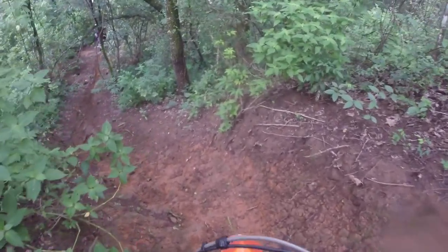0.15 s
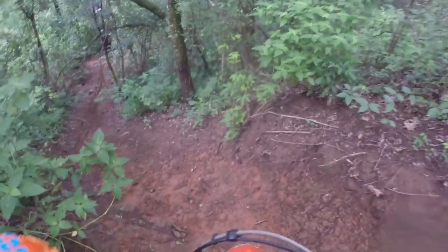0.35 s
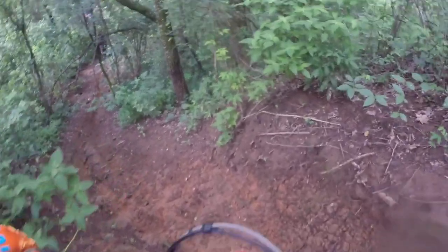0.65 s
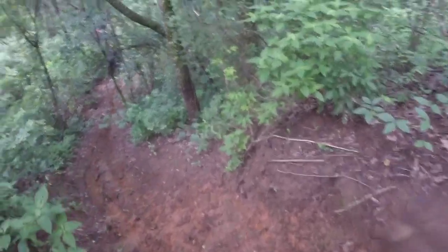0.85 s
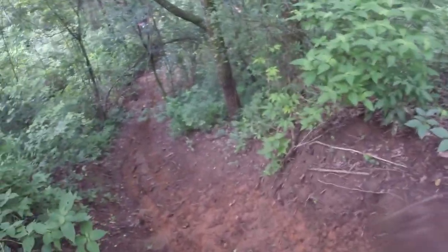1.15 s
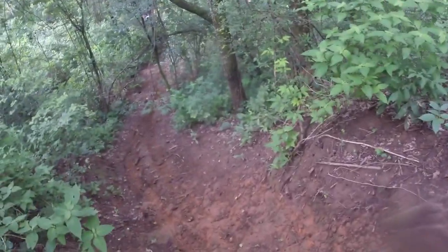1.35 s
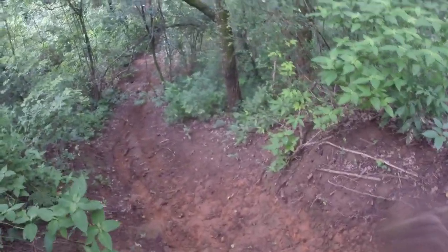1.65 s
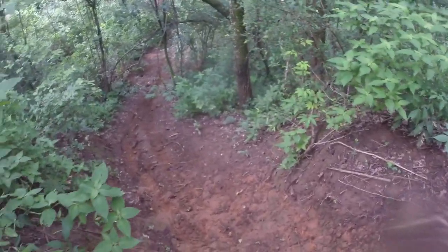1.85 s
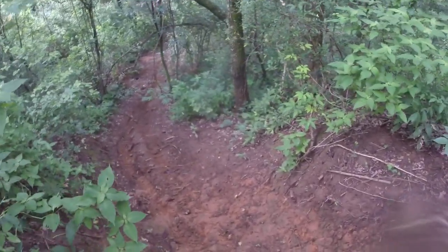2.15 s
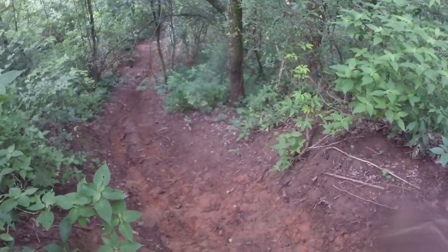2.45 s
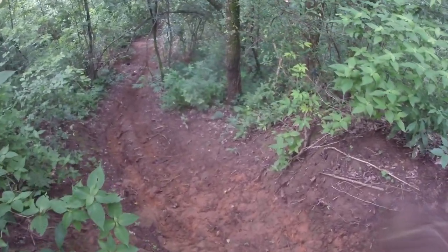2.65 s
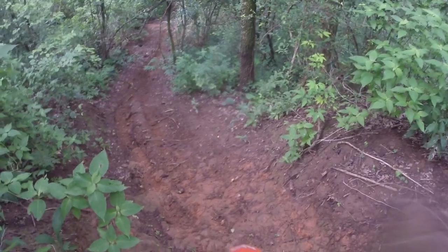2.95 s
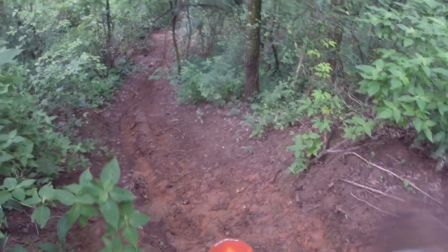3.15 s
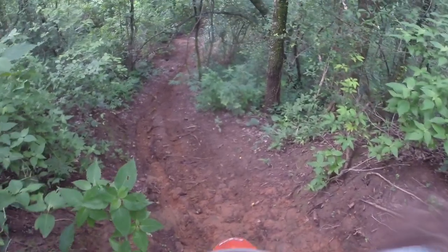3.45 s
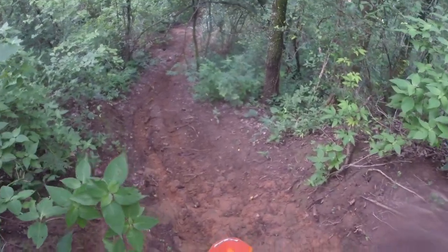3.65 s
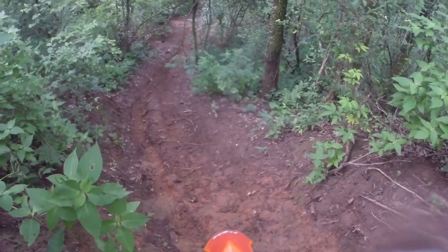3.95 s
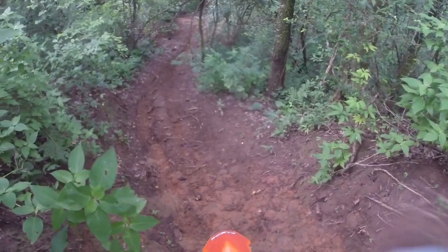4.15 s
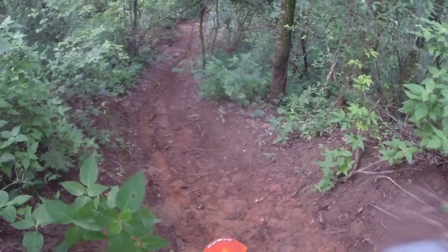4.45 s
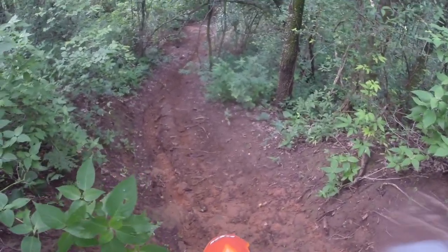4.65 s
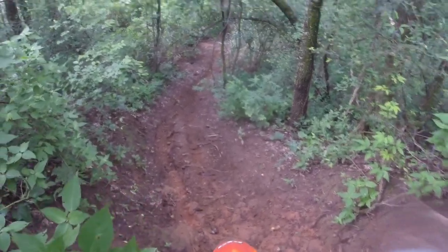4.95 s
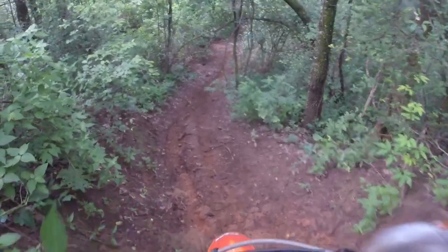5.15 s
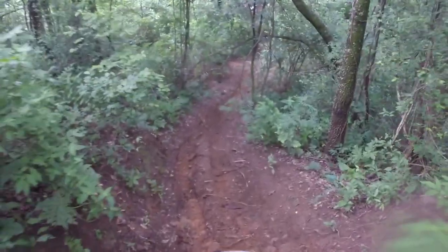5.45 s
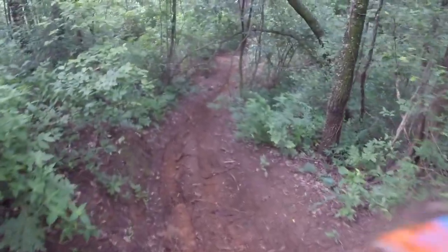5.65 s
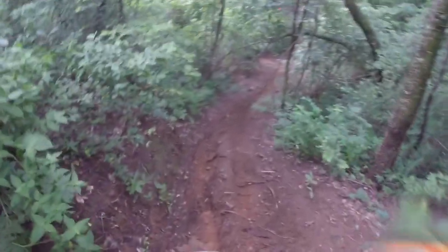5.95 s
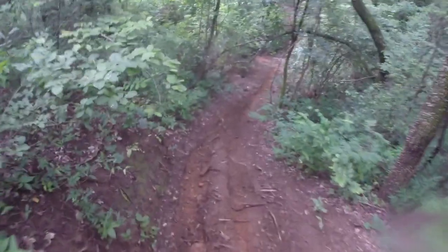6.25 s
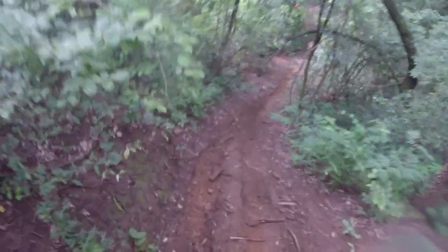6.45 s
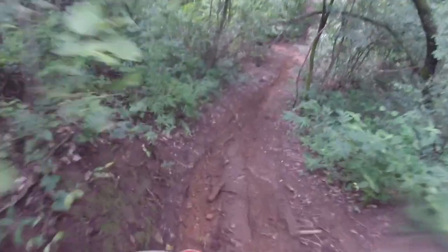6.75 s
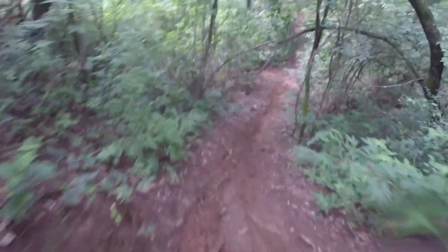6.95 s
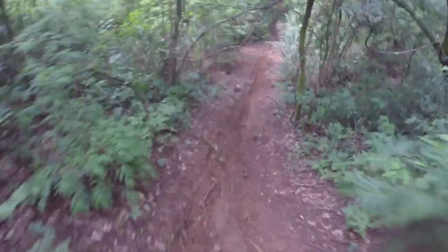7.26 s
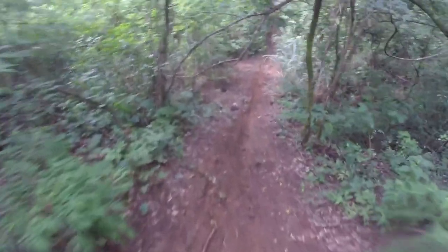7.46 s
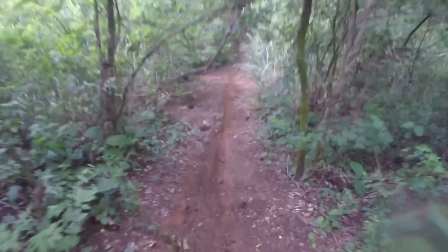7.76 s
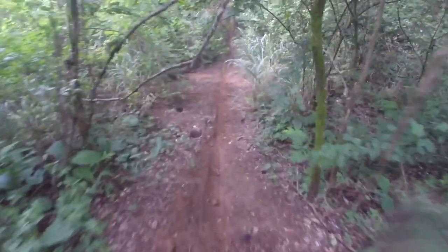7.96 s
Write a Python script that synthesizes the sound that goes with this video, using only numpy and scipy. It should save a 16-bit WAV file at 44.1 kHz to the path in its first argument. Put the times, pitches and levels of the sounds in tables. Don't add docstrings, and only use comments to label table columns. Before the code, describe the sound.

Close, boxy and muffled: dirt bike exhaust thuds around twenty-five a second, lugs down to about eleven, then jumps into a raspy one-second rev and drops off. Afterwards the engine only putters irregularly while the bike rolls through undergrowth outdoors. Leaves, twigs and dirt scrape and tap the camera's plastic case, a twig cracks sharply, and the last two seconds are busy with crackles, boomy rubbing and dull knocks. Low wind, faint insect and thin electronic whine lie behind.

```python
import sys
import numpy as np
from scipy import signal
from scipy.fft import rfft, irfft
from scipy.io import wavfile
from scipy.ndimage import uniform_filter1d

SR = 44100
rng = np.random.default_rng(int(sys.argv[2]) if len(sys.argv) > 2 else 0)


def bounce(signal):
    frames = np.transpose(np.atleast_2d(signal))
    limited = np.clip(frames, -1, 1)
    pcm = np.round(limited * 32767).astype(np.int16)
    wavfile.write(sys.argv[1], SR, pcm)


def invert_db(level):
    return 10 ** (np.asarray(level, dtype=float) / 20)


N = 357210

SNAP_S = 5.9809
BARK = (291.5, -3, 8.5, 6, 8)
# frequency in Hz, level in dB per Hz.
RUSTLE = [(360, -23), (620, 0), (821, -9), (1330, -9), (2010, -17), (2530, -17), (2970, -20.5),
          (3530, -16.5), (3880, -23.5), (4680, -16), (6200, -21), (7990, -34), (9260, -30), (11600, -33),
          (15200, -51.5)]
# start in seconds, peak in dB, boom and brightness in dB above it.
SCRAPES = [(0.125, -25, 15, -13), (0.1961, -17.5, 11, -1), (0.255, -15.5, 15.5, -16.5),
           (0.632, -28, -12, -9), (.6799, -32.5, -5, -12), (0.725, -32.5, 7, -9.5),
           (0.751, -27, 22.5, -12.5), (0.812, -34.5, 16, -10), (0.941, -39, -3, -14),
           (2.058, -34.5, 16.5, -14), (2.143, -35, 1, -11), (2.179, -30, 9, -12), (2.196, -31.5, 5, -10),
           (2.538, -41, -1, -0.5), (2.718, -37, 5, -25), (2.745, -38, 12, -30), (2.912, -36.5, 3, -32),
           (2.946, -36, 5, -27), (2.981, -35, 2, -30), (4.803, -32, -14, -12.5), (4.9748, -52, 36, -9),
           (4.997, -24.5, 3, -8.5), (5.473, -33.5, 17, -9.5), (5.795, -32, 7, -5),
           (6.4087, -20.5, 16.5, -16), (6.6563, -20.5, 18.5, -43), (6.692, -15.5, 9, -11),
           (6.8067, -32, 18.5, -5), (6.979, -29.5, 19, -1.5), (7.004, -24, 11, -8.5), (7.17, -22, 18, -14),
           (7.21, -24.5, 6, -27), (7.348, -20.5, 12, -13.5), (7.489, -16, 14.5, -12),
           (7.569, -24.5, 14.5, -12), (8.0207, -37.5, 13, -1)]
EARLY_CRACKLES = [(0.043, -44, 4, -17), (0.162, -30, 5, -14), (0.213, -34, 5, -10), (0.239, -39, 15, -26),
                  (0.266, -19.5, 13, -15), (0.359, -35, 25, -12), (0.387, -40, 16, -13.5),
                  (0.737, -35, 25, -9), (0.752, -34.5, 13, -12), (0.777, -32, 11, -11),
                  (0.829, -39, 15, -16), (0.928, -36.5, 6, -8), (0.956, -35, 26, -13)]
TRAIL_CRACKLES = [(5.2, -37.5, 23, -2.5), (5.303, -41, -4, -17), (5.335, -39, 17, -4),
                  (5.376, -51, 22, -17), (5.529, -37, 10, -3), (5.541, -42, 5, 0.5), (5.699, -40, -1, 0),
                  (5.752, -32.5, -10, -7), (5.766, -29, -2, -12), (5.922, -31, 18, -2.5),
                  (5.961, -24.5, 7.5, -20.5), (6.469, -31, 13, -11), (6.597, -31, 17, -26),
                  (6.707, -39, 26, -13), (6.954, -35, 23, 1), (6.966, -35.5, 6, -1), (7.028, -37, 8, -5.5),
                  (7.07, -28, -15, -11), (7.116, -44, -4, -24), (7.132, -24, 10, -33), (7.153, -34, 17, 0),
                  (7.179, -27, 2, -19), (7.307, -26, 18, -20), (7.334, -22.5, 17, -10),
                  (7.356, -19, 11, -30), (7.406, -20.5, -3, -8), (7.418, -34.5, 18, -3),
                  (7.444, -40, 33, -5), (7.455, -30.5, 24, -1.5), (7.472, -24, 26.5, -11),
                  (7.509, -38, 36.5, -27), (7.535, -25, 9, -21), (7.561, -23.5, 2, -22),
                  (7.594, -26, 10, -9.5), (7.624, -24.5, 0, -27), (7.673, -24.5, -6, -39),
                  (7.696, -29.5, 2, -33), (7.745, -33, 19, -15), (7.847, -47, 9, -21),
                  (7.956, -33, 23.5, -7), (7.984, -32, -8, -30), (8.01, -24, 6, -25), (8.075, -28, 4, -24)]
CRACKLES = np.r_[EARLY_CRACKLES, TRAIL_CRACKLES] + [0, 4, 0, 0]


def rms_one(x):
    return x / np.sqrt(np.mean(x ** 2) + 1e-20)


def at(s, rows):
    first, *columns = np.transpose(rows)
    return [np.interp(s, first, column) for column in columns]


def in_time(rows):
    return at(np.arange(N) / SR, rows)


def clicks(s, size):
    out = np.zeros(N)
    places = np.clip(np.round(np.asarray(s) * SR).astype(int), 0, N - 1)
    np.add.at(out, places, size)
    return out


def strike(train, shape):
    return signal.fftconvolve(train, shape)[:N]


def burst(hz, decay_ms, delay_ms=0.88):
    t = np.maximum(np.arange(SR // 12) / SR - delay_ms / 1000, 0)
    shape = -t ** 2 * np.exp(-1000 * t / decay_ms) * np.sin(2 * np.pi * hz * t)
    return shape / np.abs(shape).max()


def ring(x, hz, t60):
    r, w = invert_db(-60 / (t60 * SR)), 2 * np.pi * hz / SR
    return signal.lfilter([0, np.sin(w)], [1, -2 * r * np.cos(w), r * r], x + 1e-18)


def wave(hz, glide, middle_ms, half_ms, crest_ms):
    ms = np.arange(SR // 40) * 1000 / SR - crest_ms
    swell = np.exp(-.5 * ((ms + crest_ms - middle_ms) / half_ms) ** 2)
    shape = swell * np.cos(2 * np.pi * (hz + glide * ms / 2) * ms / 1000)
    shape = shape * np.minimum(np.arange(len(ms)) / 130, 1) ** 2
    return shape / np.abs(shape).max()


def colour(x, spectrum):
    # frequency in Hz, width in Hz, height in dB.
    case_peaks = [(1088, 12, 7.5), (1315, 26, 4.5), (2480, 330, 1.5), (3060, 10, 8.5), (3660, 1900, 0),
                  (4620, 210, 2), (6230, 140, 1), (7340, 360, 2), (9970, 200, 2)]
    hz, level_db = np.transpose(spectrum)
    grid = np.maximum(np.arange(N // 2 + 1) * SR / N, 1)
    peaks_db = sum(db / (1 + (2 * (grid - top) / width) ** 2) for top, width, db in case_peaks)
    return irfft(rfft(x) * invert_db(np.interp(np.log(grid), np.log(hz), level_db) + peaks_db), N)


def drift(rate):
    knots = rng.standard_normal(int(N / SR * 60) + 2)
    return np.interp(np.arange(N) / SR * min(rate, 59), np.arange(len(knots)), knots)


def grains(spread_db, flicker_db):
    sizes = invert_db(spread_db * np.minimum(rng.exponential(1, N), 6)) * rng.standard_normal(N)
    return rms_one(sizes * invert_db(flicker_db * (0.58 * drift(13) + 1.54 * drift(45))))


def engine():
    # time in seconds, crank speed in firings per second.
    speed = [(0.0, 25.19), (0.2, 24.4), (0.55, 24.42), (0.7, 25.22), (0.9, 23.3), (1.3, 21.52),
             (1.5, 19.96), (2.1, 13.31), (2.5, 11.28), (3.1, 11.36), (3.16, 16.05), (3.24, 16.51),
             (3.4, 36.7), (3.5, 41.96), (3.8, 42.45), (3.9, 36.49), (4.0, 37.38), (4.22, 22.66)]
    # time in seconds, thud peak in dB, load as bark dB above the thud.
    effort = [(0, -15, -12), (.2, -3, -11), (0.29, -5, -1.5), (.335, -9.5, 3.5), (.41, -2.5, -3.5),
              (.455, -9.5, 3), (.5, -4.5, -6), (.6, -4.5, -5.5), (.7, -14, 4), (.8, -9, -5.5),
              (1.549, -4, -9.5), (1.75, -6, -12.5), (2.36, -9.5, -16.5), (2.45, -16, -19),
              (3.14, -17.5, -19.5), (3.203, -11, 2), (3.3, -5, -4.5), (3.37, -5.5, 3.5), (3.43, -11, 9.5),
              (3.49, -12.5, 9.5), (3.54, -15.5, 3.5), (3.765, -10, 7), (3.832, -17, 0), (4.013, -9, 7),
              (4.07, -10.5, -20.5)]
    # time in seconds, thud peak in dB, bark in dB above it.
    uneven = [(0.228, -8, -4.5), (0.276, -4.5, -36), (0.319, -7.5, -8), (0.352, -9.5, -1),
              (0.385, -17, 3.5), (3.185, -6.5, -13.5), (3.245, -8, -7), (3.442, -18.5, -25),
              (4.222, -17.5, -34), (4.255, -10.5, -13.5), (4.297, -12, -10.5), (4.347, -17, -9),
              (4.384, -12.5, -14), (4.442, -20.5, -9), (4.478, -12, -11), (4.528, -8.5, -16),
              (4.591, -19, -14), (4.629, -12, -11), (4.684, -13.5, -11), (4.714, -15, -15),
              (4.741, -13.5, -7)]
    # pitch in Hz, glide in Hz per ms, middle, half length and crest in ms.
    thud_wave = (121.5, 6.1, 8.25, 1.86, 6.73)
    soft_wave = (80, 13, 7.72, 2.28, 6.5)
    rev_bark = (263, -12, 7, 4, 7.5)
    throttle_s = 0.22
    s, gulp_s = firings(speed, first_turn=0.37)
    (thud_db, load_db), (rate,) = at(s, effort), at(s, speed)
    misfire = np.arange(len(s)) == np.argmin(np.abs(s - 3.455))
    thud_db = thud_db - 21 * misfire
    ring_db = -0.5 + 2.82 * thud_db - 0.66 * np.maximum(rate - 22, 0)
    levels = np.array([thud_db, thud_db + load_db, ring_db])
    levels = levels + 0.37 * rng.standard_normal((len(s), 3)).T
    s = s - .0092
    gulp_s = gulp_s - .0092 + .002 * rng.standard_normal(len(s))
    late_s, late_db, late_bark = np.transpose(uneven)
    late_s = late_s + .005
    hard = clicks(s, invert_db(levels[0] + 0.5) * (s > throttle_s))
    soft = clicks(late_s, invert_db(late_db + 3.0))
    levels = levels - 60 * (s <= throttle_s)
    barks = clicks(s, invert_db(levels[1] - 8.5)) + clicks(late_s, invert_db(late_db + late_bark - 1.5))
    thuds = strike(hard, wave(*thud_wave))
    out = thuds + strike(soft, wave(*soft_wave))
    rate_curve = in_time(speed)[0]
    fast = np.clip((rate_curve - 23) / 9, 0, 1) * (np.arange(N) < speed[-1][0] * SR)
    out += strike(barks * (1 - fast), wave(*BARK))
    out += strike(invert_db(3.5) * barks * fast, wave(*rev_bark))
    gulps = clicks(gulp_s, invert_db(levels[0]))
    gulp_wave = wave(*thud_wave) + 0.13 * wave(*BARK)
    out += aftermath(rate_curve, in_time(effort)[1], hard, soft, thuds, gulps, gulp_wave)
    return out + exhaust_hiss(barks, hard) + case_ring(s, levels, rate)


def firings(curve, first_turn):
    t = np.arange(N) / SR
    turns = np.cumsum(in_time(curve)[0] * (t >= curve[0][0])) / SR - first_turn
    count = np.arange(int(turns[min(round(curve[-1][0] * SR), N - 1)]) + 1)
    return np.interp(count, turns, t), np.interp(count + .5, turns, t)


def aftermath(rate_curve, load_curve, hard, soft, thuds, gulps, gulp_wave):
    # firings per second, then low tail, pipe tail, returns and intake gulp in dB above the thud.
    after = [
        (10.8, -6, -32.5, 6.5, -27.5),
        (21.4, -16, -34, -10, -36.5),
        (25.9, -24, -15, -7, -6),
        (38, -1.5, -33.5, -27, -6.5),
    ]
    # delay in ms, level in dB.
    reflections = [
        (7.6, -3.5),
        (13.2, -15.5),
        (27.8, -20),
    ]
    # frequency in Hz, decay time t60 in seconds.
    low_tail = (71, .17)
    pipe_tail = (147, .07)
    low_db, pipe_db, back_db, gulp_db = at(rate_curve, after)
    fed_db = 0.5 * (load_curve + 8)
    pipe_db, back_db = pipe_db + fed_db, back_db + fed_db
    low_db = low_db - 0.89 * fed_db
    delays, return_db = np.transpose(reflections)
    echo = clicks(delays / 1000, invert_db(return_db))[:SR // 20]
    returns = strike(invert_db(np.minimum(back_db, 2)) * thuds, echo)
    push = np.r_[np.zeros(SR // 100), np.hanning(200) / 100]
    low = strike(invert_db(low_db) * hard + invert_db(-5.5) * soft, push)
    blip_db = 14 * (np.arange(N) < 0.59 * SR)
    pipe = strike(invert_db(blip_db) * (invert_db(pipe_db) * hard + invert_db(-30) * soft), push)
    tails = ring(low, *low_tail) + ring(pipe, *pipe_tail)
    return returns + tails + strike(invert_db(gulp_db) * gulps, gulp_wave)


def exhaust_hiss(barks, hard):
    revved = np.arange(N) > 3.17 * SR
    swell = np.r_[np.zeros(SR // 600), np.hanning(SR // 70) ** .6, .12 * np.ones(SR // 90)]
    puff = strike((barks + invert_db(-15) * hard * revved) ** 1.2, swell)
    tilt = [(700, -2.5), (1250, 4.5), (3000, 8.5), (5000, -1.0), (9000, -4.5)]   # Hz, dB
    gas = colour(colour(grains(1.9, .1), RUSTLE), tilt)
    return invert_db(-29.0) * puff * rms_one(gas)


def case_ring(s, levels, rate):
    late_ring = (490, 3.87, 5.41)
    rasp = (434, -8, 11, 3.5, 7.5)
    edge = (631.5, -7, 10, 3.5, 5)
    case = strike(clicks(s, invert_db(levels[2] - 5.5)), burst(*late_ring))
    rasps = clicks(s, invert_db(levels[1] - 10.5) * np.clip((rate - 24) / 17, 0, 1))
    return case - strike(rasps, wave(*rasp) + invert_db(-20) * wave(*edge))


def putts():
    # time in seconds, thud peak in dB, bark in dB above it.
    before = [
        (0.0058, -7, -21),
        (0.045, -6.5, -10.5),
        (0.0857, -11.5, -7),
        (0.117, -4.5, -13),
        (0.1698, -8, -6.5),
        (0.2053, -19, -10),
    ]
    # time in seconds, thud peak in dB, bark in dB above it.
    downhill = [(4.8134, -13.0, -14), (4.834, -25.5, -2.5), (4.8569, -19.5, -2.5), (4.8828, -22, -13),
                (4.9034, -14, -11.5), (4.9319, -15.5, -5.5), (5.0076, -18.5, -16), (5.0484, -15, -6.5),
                (5.082, -14.5, -12), (5.1127, -16, -7), (5.17, -16.5, -11), (5.2068, -20, -14),
                (5.2499, -11, -7), (5.347, -14, -10), (5.4372, -14.5, -17), (5.4661, -16, -10),
                (5.5288, -17.5, -5), (5.55, -19.5, -11), (5.6206, -14.5, -17), (5.648, -17.1, -18),
                (5.7006, -14, -14), (5.7322, -19.5, -14), (5.797, -17, -7), (5.8724, -12.5, -10.1),
                (5.906, -14, -18), (6.0566, -27.5, -11.8), (6.146, -33.5, -5), (6.2376, -27, -22.5),
                (6.355, -29.5, -11), (6.5714, -31, -2), (6.5932, -21, -12), (6.6545, -26, -10),
                (6.817, -35, 2), (6.8486, -29, -5), (6.871, -24.5, -6.0), (6.904, -25, 1), (6.9422, -23, 0),
                (7.08, -37, -14), (7.1414, -13.5, -8), (7.331, -19, -14), (7.3731, -18.5, 1),
                (7.3964, -21, -8), (7.4346, -21, -2), (7.5847, -17, -1), (7.6085, -26.5, -2),
                (7.682, -22, -11), (7.704, -15, -18), (7.8268, -21, -22), (7.849, -26, -6.0),
                (7.9686, -31, -4), (8.045, -20, -7)]
    putt_wave = (101, 6.5, 9.2, 5.26, 9.12)
    s, db, bark_db = np.transpose(np.r_[before, downhill])
    train = clicks(s, invert_db(db + 0.5))
    push = np.r_[np.zeros(SR // 80), np.hanning(200) / 100]
    tail = ring(strike(train, push), 92, 0.14)
    barks = strike(clicks(s + 0.0018, invert_db(db + bark_db - 3.5)), wave(*BARK))
    return -strike(train, wave(*putt_wave)) - barks + invert_db(-7.5) * tail


def brush():
    # time in seconds, pressure as boom dB, rustle in dB above it.
    pressure = [(0, -29, -10.5), (.25, -41, -37), (.4, -27.5, -24.5), (.8, -33.5, -19.5), (1.2, -38, -28.5),
                (2.05, -33.5, -20.5), (2.6, -38, -20), (3.2, -38, -12.5), (3.5, -35, -16),
                (3.95, -38.5, -13.5), (4.26, -44, -18), (4.7, -40, -18.5), (5.35, -37, -16.5),
                (5.72, -34.5, -12), (5.9, -30, -17.5), (6.2, -41, -16), (6.6, -34.5, -12),
                (7.47, -26, -17.5), (7.8, -34.5, -13.5), (8.1, -27, -25.5)]
    boom_db, dry_db = in_time(pressure)
    rustle_db = boom_db + dry_db
    rumble_db = -25 + 0.54 * (boom_db + 34.0)
    boom, low, middle, high = invert_db(boom_db), np.zeros(N), np.zeros(N), np.zeros(N)
    contacts = np.r_[CRACKLES, SCRAPES, flicks(rustle_db)]
    for k, (s, db, boom_rel, bright_rel) in enumerate(contacts):
        if k < len(CRACKLES):
            t60, rise, drags = 0.057, 0.07, 0
        else:
            t60 = np.clip(0.055 + 0.0016 * (db + 37.0), .03, .2)
            rise, drags = 0.03, 1
        start = round(s * SR)
        t = np.arange(min(int(.3 * SR), N - start)) / SR
        drag = drags * invert_db(-11.5 - 60 * t / (2.6 * t60))
        shape = invert_db(db - 7.5) * (invert_db(-75 * t / t60) + drag) * (1 - np.exp(-t / (rise * t60)))
        span = slice(start, start + len(t))
        low[span] += shape
        middle[span] += shape * invert_db(0.5 * (bright_rel + 9))
        high[span] += shape * invert_db(bright_rel)
        boom[span] += shape * invert_db(boom_rel - 1.0)
    rustle = colour(grains(2.9, 1.0), RUSTLE)
    coarse = colour(grains(4.1, 2.6), RUSTLE)
    dull = signal.sosfilt(signal.butter(4, 1800, fs=SR, output="sos"), coarse)
    dry_band = signal.sosfilt(signal.butter(3, [1800, 4000], "band", fs=SR, output="sos"), rustle)
    bright = signal.sosfilt(signal.butter(4, 4000, "high", fs=SR, output="sos"), rustle)
    deep = signal.butter(2, [48, 220], "band", fs=SR, output="sos")
    rumble = rms_one(signal.sosfilt(deep, grains(1.6, 3.12)))
    flicker_db = 2.2 * (drift(9) / 2 + drift(50))
    steady = invert_db(rustle_db - 2.5 + flicker_db) * rms_one(rustle) + invert_db(rumble_db - 7.0) * rumble
    scraped = low * rms_one(dull) + invert_db(-5.5) * middle * rms_one(dry_band) + high * rms_one(bright)
    return steady + scraped + boom * cavity(grains(3.44, 1.61))


def flicks(rustle_db):
    rolling_s, per_s, peak_db = 4.8, 10, 4
    length_s = N / SR - .05 - rolling_s
    s, size, weight = rng.random((round(per_s * length_s), 3)).T
    s = rolling_s + s * length_s
    level_db = rustle_db[(s * SR).astype(int)] + peak_db * (.5 + size)
    return np.c_[s, level_db, 25 * weight - 5, -6 - 12 * weight]


def cavity(x):
    # frequency in Hz, width in Hz, level in dB.
    air_modes = [
        (308, 86, -5),
        (411.3, 70, 2),
        (489.3, 149, -3),
    ]
    modes = np.zeros(N)
    for k, (hz, width, db) in enumerate(air_modes):
        modes += (-1) ** k * invert_db(db) * width * ring(x, hz, 2.3 / width)
    return rms_one(signal.sosfilt(signal.butter(4, 600, fs=SR, output="sos"), modes))


def snicks():
    out, rows = np.zeros(N + SR), np.r_[CRACKLES, SCRAPES]
    for (s, db, _, _), (pitch, length) in zip(rows, rng.random((len(rows), 2))):
        shape = burst(1000 + 650 * pitch, .7 + .8 * length)
        start = round(s * SR)
        out[start:start + len(shape)] += invert_db(db - 14) * shape
    return out[:N]


def taps():
    # time in seconds, peak in dB.
    grit = [(0.1101, -44), (0.1264, -33), (0.3065, -46), (0.594, -55), (0.612, -54), (2.122, -54),
            (2.284, -50), (6.3037, -39.5), (6.492, -41.5), (6.6218, -55), (6.6378, -46), (6.7696, -38),
            (6.9006, -40), (6.838, -49), (6.98, -33), (7.235, -44), (7.4075, -30), (7.434, -39),
            (7.651, -40), (7.778, -29)]
    # time in seconds, peak in dB, frequency in Hz, decay in ms.
    knocks = [
        (6.98, -2, 422, 0.97),
        (7.144, -9.5, 296, 0.85),
        (8.022, -7.5, 308, 0.92),
    ]
    tick_s, tick_db = np.transpose(grit)
    out = strike(clicks(tick_s, invert_db(tick_db)), burst(6800, 0.12) + 0.4 * burst(2540, 0.21))
    for s, db, hz, decay_ms in knocks:
        out += strike(clicks([s], invert_db(db)), burst(hz, decay_ms))
    return out


def snap():
    # frequency in Hz, level in dB, decay time t60 in seconds.
    shell_modes = [(540, -10, 0.022), (1063, -10, 0.029), (1360, -7.5, 0.023), (1710, -4.5, 0.014),
                   (2520, -1, 0.0078), (3940, -12, 0.013), (4940, -15, .008), (5840, -16, 0.012),
                   (7270, -11.5, 0.0096), (12500, -17.5, .004)]
    hits = clicks([SNAP_S, SNAP_S + .0004], invert_db([-9, 0]) * [-1, 1])
    blow = strike(hits, np.hanning(7) / 3)
    noise = colour(colour(rng.standard_normal(N), RUSTLE), [(5500, -1.5), (9500, -21.5)])
    out = invert_db(-24.0) * signal.lfilter([1], [1, -invert_db(-60 / (.06 * SR))], blow) * rms_one(noise)
    for k, (hz, db, t60) in enumerate(shell_modes):
        out += (-1) ** k * invert_db(db) * ring(blow, hz, t60)
    return out


def ripples():
    # time in seconds, peak in dB.
    hits = [(.36, -14), (.39, -19), (.445, -17), (.472, -14), (0.504, -25), (.526, -16.5), (.553, -22),
            (0.607, -19), (.668, -19)]
    # frequency in Hz, decay in ms, level in dB.
    low_modes = [
        (366, 2.85, -1.5),
        (488, 2.8, -5.5),
    ]
    s, db = np.transpose(hits)
    shape = sum(invert_db(rel_db) * burst(hz, decay_ms) for hz, decay_ms, rel_db in low_modes)
    return strike(clicks(s, invert_db(db)), shape)


def squeaks():
    # start in seconds, length in seconds, pitch in Hz, level in dB, overtone slope in dB,
    # share by which the pitch slides.
    rubs = [(0.378, 0.036, 1940, -41, -7.5, -0.046), (0.675, 0.03, 1770, -45, -10, -.08),
            (0.732, 0.028, 1450, -44.5, -6, .05), (2.062, 0.012, 1080, -43, -24, .01),
            (2.07, .02, 2500, -57, -26, -.05), (2.82, .06, 1170, -57, -20, 0.11),
            (2.955, 0.025, 1405, -50.5, -8, -.12), (3.069, 0.018, 1060, -54, -20, -.08),
            (3.141, 0.048, 1760, -52.5, -8, -0.049), (5.799, 0.028, 4600, -52, -30, .01),
            (6.264, 0.0069, 4630, -58, -16, .01), (6.725, 0.055, 9450, -69, -20, .005),
            (6.795, 0.02, 9450, -71, -17, .005)]
    out = np.zeros(N)
    rough = 0.035 * rng.standard_normal(N // 60 + 1).repeat(60)[:N]
    waver = 0.0089 * drift(59) + rough
    scratch = invert_db(3.7 * rng.standard_normal(N // 40 + 1)).repeat(40)[:N]
    for s, length, hz, db, slope_db, slide in rubs:
        span = slice(round(s * SR), round((s + length) * SR))
        bend = slide * np.linspace(-.5, .5, span.stop - span.start)
        phase = 2 * np.pi * hz * np.cumsum(1 + waver[span] + bend) / SR
        swell = np.hanning(len(phase)) ** 0.24
        for k in range(5):
            if (k + 1) * hz < 12000:
                out[span] += invert_db(db + slope_db * k) * np.sin((k + 1) * phase) * swell
    return out * uniform_filter1d(scratch, size=40) * invert_db(3.0)


def gain_control():
    duck_db, recover_s, look_ahead_s = -13, 0.75, .005
    since = np.arange(N) / SR - SNAP_S + look_ahead_s
    gain_db = np.where(since > 0, duck_db * np.exp(-np.maximum(since, 0) / recover_s), 0)
    return invert_db(uniform_filter1d(gain_db, size=60))


def wind():
    deep = signal.butter(2, [22, 58], "band", fs=SR, output="sos")
    low = signal.sosfilt(deep, rng.standard_normal(N))
    return invert_db(-40.5 + 2.8 * drift(3)) * rms_one(low)


def insect():
    # middle in seconds, half length in seconds, level in dB, pitch in Hz.
    swells = [
        (.48, 0.59, -64, 3230),
        (1.7, 0.11, -58.5, 3380),
        (2.2, 0.15, -59.5, 3260),
        (6.15, 0.082, -58.5, 3560),
    ]
    t, noise = np.arange(N) / SR, rng.standard_normal(N)

    def band(hz):
        return rms_one(ring(ring(noise, hz - 40, 0.006), hz + 40, 0.007))

    out = invert_db(-70) * band(3270)
    for s, half, db, hz in swells:
        out += invert_db(db) * np.exp(-2 * ((t - s) / half) ** 2) * band(hz)
    return gain_control() * out


def forest():
    # frequency in Hz, level in dB per Hz.
    far_hiss = [(360, -36), (620, -18), (952, -32), (1380, -15), (1930, -19.5), (3300, -24), (3880, -26),
                (13100, -43.5), (14400, -37), (15200, -45.5)]
    # start in seconds, hold in seconds, change of whine in dB.
    sinks = [
        (.4, .5, -12),
        (3.3, .9, -14),
        (5.976, .02, -21),
    ]
    t = np.arange(N) / SR
    hiss = invert_db(-60.0) * gain_control() * rms_one(colour(rng.standard_normal(N), far_hiss))
    partner = invert_db(3.5) * rms_one(ring(rng.standard_normal(N), 10050, 0.0074))
    sunk_db = np.zeros(N)
    for s, hold, db in sinks:
        sunk_db += db * (t > s) * np.exp(-np.maximum(t - s - hold, 0) / .3)
    whine = partner + np.sqrt(2) * np.sin(2 * np.pi * 13906 * t)
    return invert_db(0.33 * sunk_db) * hiss + insect() + invert_db(-82 + sunk_db) * whine


def scene():
    bike = signal.sosfiltfilt(signal.butter(2, 46, "high", fs=SR, output="sos"), engine() + putts())
    rubbing = gain_control() * (brush() + wind() + snicks())
    return (bike + rubbing + taps() + snap() + ripples() + squeaks() + forest())[None]


def roll_off(x):
    return signal.sosfilt(signal.butter(12, 15150, fs=SR, output="sos"), x)


def record(dry):
    x = signal.sosfiltfilt(signal.butter(2, 27, "high", fs=SR, output="sos"), dry)
    x = signal.sosfilt(signal.butter(10, 14600, fs=SR, output="sos"), np.clip(x, -1, 1))
    return roll_off(np.clip(x, -1, 1))


dry = scene()
out = record(dry)
bounce(out)
```